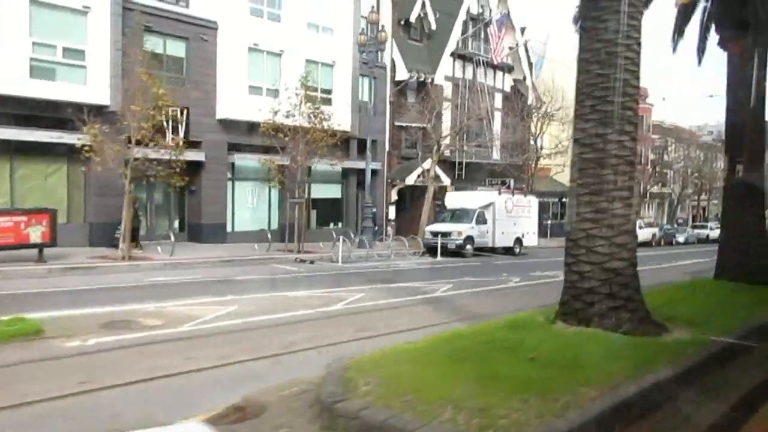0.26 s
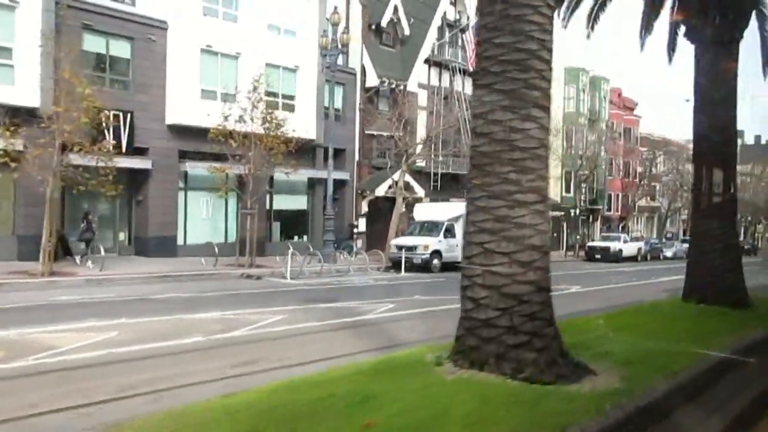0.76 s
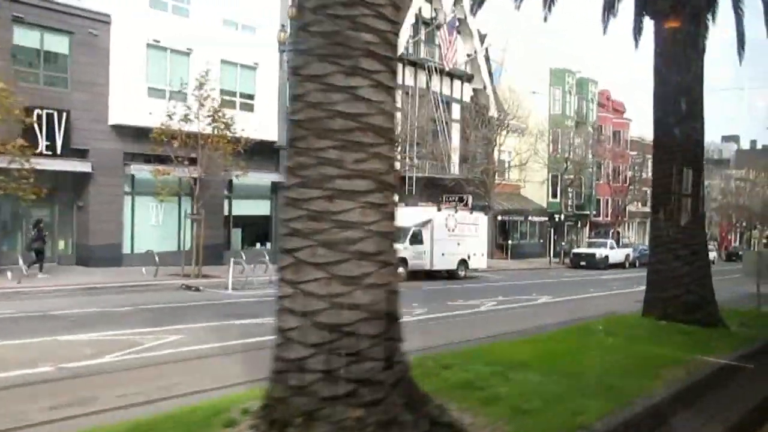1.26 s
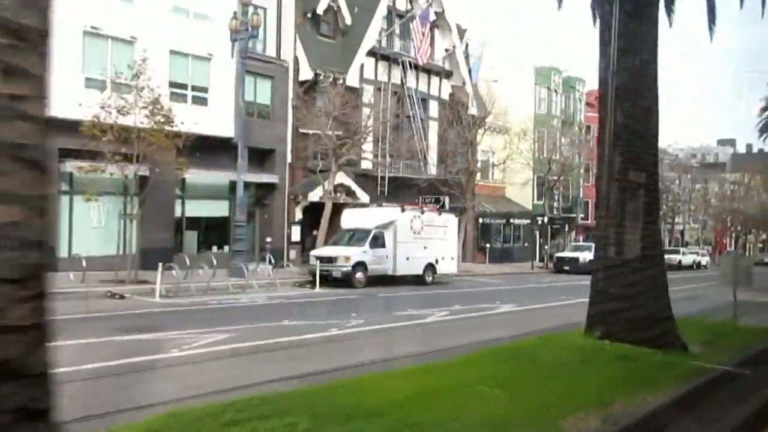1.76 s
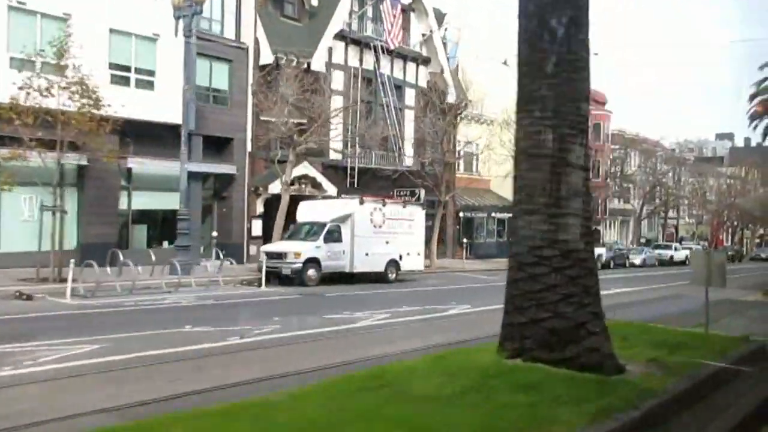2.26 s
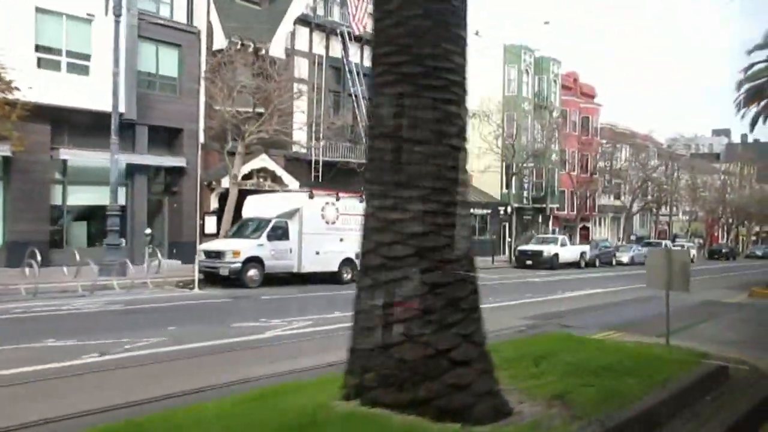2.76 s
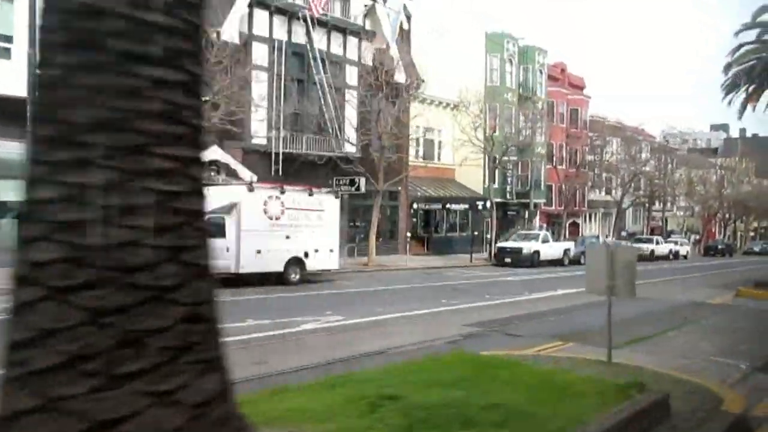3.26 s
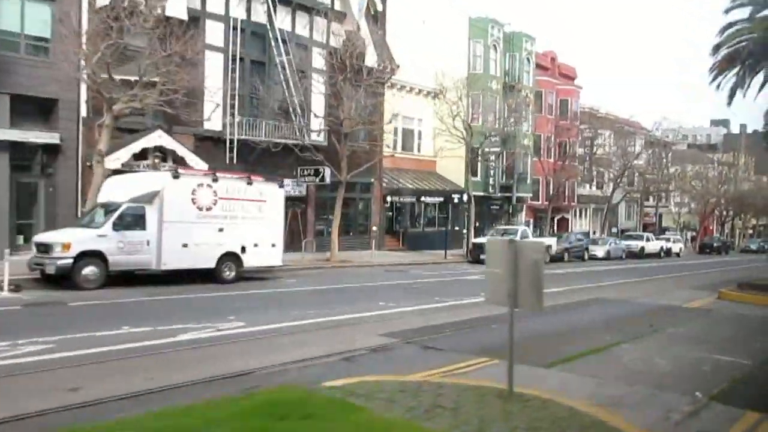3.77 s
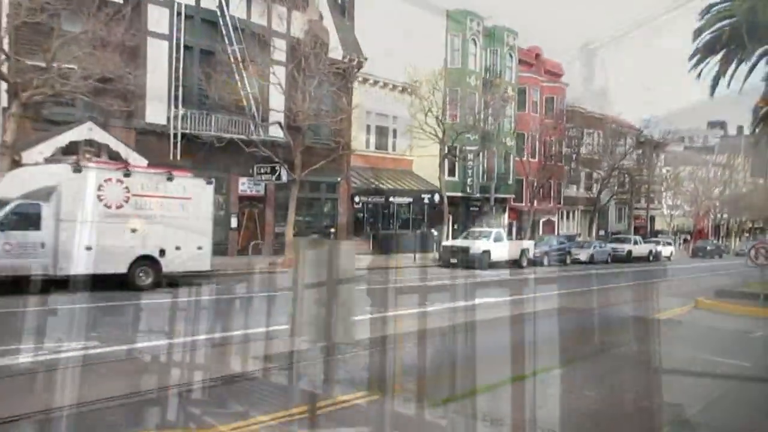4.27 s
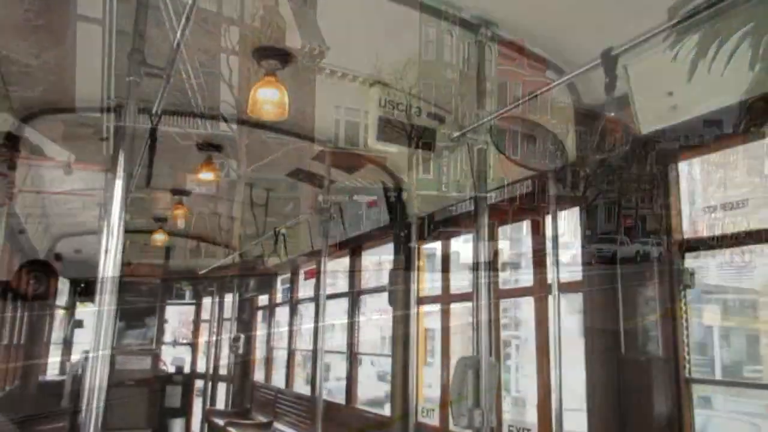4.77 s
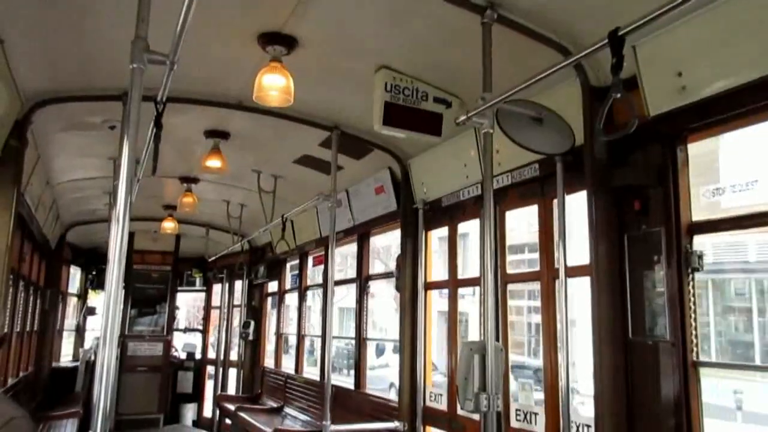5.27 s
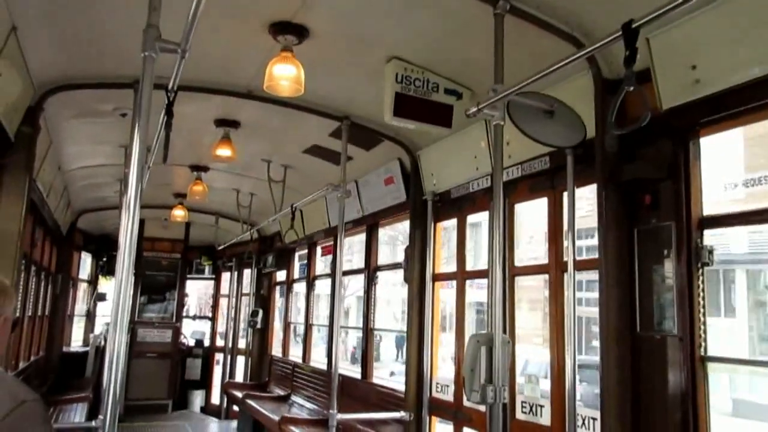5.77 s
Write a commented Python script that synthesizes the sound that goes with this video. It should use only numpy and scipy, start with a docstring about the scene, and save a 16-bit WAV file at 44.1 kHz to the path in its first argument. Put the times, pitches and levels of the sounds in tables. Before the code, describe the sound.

Inside an old wooden streetcar in motion, a strong uneven rumble shakes the body, with brief low booms and two wavering hums. Rail joints bring rattles and dull floor knocks, thickest in the first second and again near 2.5 to 2.9 seconds. Faint high squeaks follow. After 4.2 seconds another stretch fades in with a brighter roll, and a low drone sounds near the end. Single microphone in the cabin, no voices.

```python
"""Inside an old wooden streetcar rolling along city rails. Wheel roughness shakes the body into a rumble
with booms and two hums, all from filtered noise and wavering sines; rolling contact hisses over it.
Rail joints jolt the car with bursts of rattle and floor knocks, wheel flanges sing faintly, and
something squeaks very high among faint ticks. Late on, a second stretch of track fades in with a
brighter roll, and a low drone follows."""
import sys
import numpy as np
from scipy import signal
from scipy.fft import rfft, irfft
from scipy.io import wavfile

SR = 44100
rng = np.random.default_rng(int(sys.argv[2]) if len(sys.argv) > 2 else 0)


def int16_out(signal):
    """Quantize to a 16-bit WAV file."""
    q = np.round(np.clip(np.atleast_2d(signal).T, -1, 1) * 32767)
    wavfile.write(sys.argv[1], SR, q.astype(np.int16))


def elevation(decibels):
    """Turn decibel levels (scalar or array-like) into linear amplitude ratios."""
    levels = np.asarray(decibels, float)
    return 10 ** (levels / 20)


N = 265472
TIME = np.arange(N) / SR

# Jolts at the rail joints. Each row: start in seconds, rattle level ahead of its envelope in dB,
# t60 in seconds, treble slope in dB per octave, wheel ring ahead of the envelope in dB, rumble lift in dB.
JOLT_TABLE = [(.29, -26.5, .45, -19, -37, 7), (.475, -36, .25, -20, -34, 2.5), (.575, -35, .4, -14, -50, 3),
              (.63, -32, .25, -14, -44, 2), (.7, -29.5, .22, -14, -44, 2), (.79, -28, .5, -9, -39, 2.5),
              (.97, -38, .6, -14, -39, 4.5), (1.19, -29.5, .6, -12, -41, 3.5),
              (2.45, -27.5, .55, -14, -30, 2.5), (2.852, -27, .2, -15, -34, 2),
              (3.48, -41, .4, -11, -52, 1.5), (4.03, -38, .6, -14, -40, .8), (4.36, -42, .5, -14, -42, 0),
              (5.06, -37, .5, -14, -50, 1.5)]
# Ringing modes of a wheel. Each row: frequency in Hz, width of one filter pass in Hz, relative level in dB.
WHEEL_MODES = [(1060, 90, 0), (1570, 90, -9), (1830, 120, -12), (2360, 130, -1), (2560, 140, -4),
               (2780, 90, -9), (3190, 90, -11)]


def unit_rms(x):
    """Scaled to unit power."""
    return x / np.sqrt(np.mean(x ** 2) + 1e-20)


def over_time(rows):
    """A curve of (seconds, value) points drawn out over time."""
    seconds, values = np.transpose(rows)
    return np.interp(TIME, seconds, values)


def drift(rate_hz):
    """Slow chance of spread 1: noise twice through a one-pole low-pass, made at every 40th sample."""
    r = np.exp(-80 * np.pi * rate_hz / SR)
    white = rng.standard_normal(N // 40 + 2002)
    slow = signal.lfilter([1], [1, -2 * r, r * r], white)[2000:]  # skip the filter's start-up
    return np.interp(np.arange(N) / 40, np.arange(len(slow)), unit_rms(slow))


def coloured(white, spectrum):
    """White noise given a spectrum of (Hz, dB per Hz) points, joined on a log axis; rms 1."""
    hz, db = np.transpose(spectrum)
    bins_hz = np.fft.rfftfreq(len(white), 1 / SR) + 1
    gain = elevation(np.interp(np.log(bins_hz), np.log(hz), db))
    return unit_rms(irfft(rfft(white) * gain, len(white)))


def resonances(x, modes):
    """Parallel resonances, each passed twice so that its skirts are steep."""
    out = 0
    for hz, width_hz, db in modes:
        r = np.exp(-np.pi * width_hz / SR)
        b = (1 - r * r) / 2 * np.array([1, 0, -1])
        a = [1, -2 * r * np.cos(2 * np.pi * hz / SR), r * r]
        once = signal.lfilter(b, a, x)
        out = out + elevation(db) * signal.lfilter(b, a, once)
    return out


def ringing_mode(white, hz, width_hz):
    """One narrow resonance excited by noise; rms 1."""
    return unit_rms(resonances(white, [(hz, width_hz, 0)]))


def patchy(x, own_db, shared_db=0):
    """Octave by octave the level flickers on its own, on top of a movement that all octaves share."""
    out, rest = 0, x
    for edge_hz in 60 * 2. ** np.arange(8):
        low_pass = signal.butter(2, edge_hz, fs=SR, output="sos")
        low = signal.sosfiltfilt(low_pass, rest)
        out = out + low * elevation(shared_db + own_db * drift(7.7))
        rest = rest - low
    return out + rest * elevation(shared_db + own_db * drift(5.0))


def two_stretches(spectra, later):
    """Noise of the first stretch fades out as that of the second fades in, at equal power."""
    first, second = (coloured(rng.standard_normal(N), spectrum) for spectrum in spectra)
    return np.sqrt(1 - later) * first + np.sqrt(later) * second


def wavering_tone(hz, level_db, waver_hz, flicker_db):
    """A near sine whose pitch wavers and whose level flickers."""
    phase = 2 * np.pi * np.cumsum(hz + waver_hz * drift(7.0)) / SR
    return np.sqrt(2) * elevation(level_db + flicker_db * drift(20.7)) * np.sin(phase)


def swells():
    """Each jolt briefly lifts the rumble, in dB; the body answers a little after the rattle."""
    lag_s, half_s = 0.049, 0.043
    return sum(lift_db * np.exp(-((TIME - s - lag_s) / half_s) ** 2) for s, *_, lift_db in JOLT_TABLE)


def rumble(later):
    """Broad shaking of the body, with narrow resonances that swell and sink one by one."""
    # Rumble level along the ride. Each row: time in seconds, level in dB.
    ride_level = [(0, -18.5), (.25, -20.5), (.4, -19.5), (.47, -18), (.55, -22.5), (.6, -14), (.65, -20),
                  (.7, -15.5), (.86, -15.5), (.95, -18.5), (1.0, -18), (1.15, -16), (1.24, -17.5),
                  (1.4, -15.5), (1.72, -15.5), (1.79, -13.5), (2.65, -15.5), (2.92, -15), (3.0, -20.5),
                  (3.4, -17), (3.52, -19.5), (3.92, -14.5), (4.39, -15.5), (4.73, -20.5), (5.2, -18),
                  (5.7, -17), (6.02, -17)]
    # Colour of the body's shaking, one list for each stretch. Each row: frequency in Hz, dB per Hz.
    rumble_colours = [(12, -51.5), (20, -20), (54, -6), (80, -14), (112, -6.5), (138, -2), (199, -1.5),
                      (297, -10), (352, -0.5), (460, -2.5), (553, -9), (841, -13.5), (1100, -23.5),
                      (1430, -55.5), (2420, -120)], [(12, -45), (20, -20), (92, -9), (177, -9.5),
                      (202, -7.5), (318, -11), (352, -14), (445, -5.5), (492, -25), (517, -13.5),
                      (1100, -30), (1430, -36), (2420, -120)]
    # Body resonances. Each row: frequency in Hz, width of one filter pass in Hz, dB over the broad shaking.
    body_modes = [(90.7, 17.3, -12), (146.3, 33, -12), (292, 63, -18), (376.5, 84, -19), (433, 20.5, -17.5),
                  (446.7, 22, -14.5)]
    out = patchy(two_stretches(rumble_colours, later), own_db=1.5, shared_db=0.22 * drift(1.7))
    for hz, width_hz, db in body_modes:
        out = out + elevation(db + 1.8 * drift(2.1)) * ringing_mode(rng.standard_normal(N), hz, width_hz)
    return elevation(over_time(ride_level) + swells()) * unit_rms(out)


def roll(later):
    """Steel on steel: the hiss of rolling contact, with wheel modes that come and go."""
    # Level of the roll. Each row: time in seconds, level in dB.
    roll_level = [(0, -38.5), (.3, -35), (.6, -35.5), (1.1, -34.5), (1.35, -32), (2.3, -32), (2.88, -34),
                  (2.97, -38), (3.3, -37), (3.7, -35), (4.2, -34.5), (4.65, -35), (5.05, -28),
                  (5.45, -24.5), (6.02, -25)]
    # Colour of the rolling contact, one list for each stretch. Each row: frequency in Hz, dB per Hz.
    roll_colours = ([(470, -27), (800, -10.5), (890, -10), (1340, -18), (1550, -18), (2000, -21.5),
                    (3100, -24.5), (3400, -27.5), (5100, -33), (6100, -38), (9100, -40.5), (9800, -47),
                    (12500, -49), (14800, -58.5)], [(470, -3.5), (800, 0), (830, 2), (1020, -1.5),
                    (1300, -6.5), (1580, -8), (1830, -11.5), (2340, -16.5), (2950, -17.5), (6280, -32),
                    (7270, -30.5), (10200, -41.5), (14800, -49.5)])
    # Broad resonances of the second stretch. Each row: frequency in Hz, width of one filter pass in Hz,
    # dB over the contact hiss.
    second_modes = [(1560, 160, -22), (2250, 300, -26), (2900, 350, -26), (3200, 200, -31),
                    (3860, 350, -31), (4300, 350, -32), (5700, 200, -41)]
    out = patchy(two_stretches(roll_colours, later), own_db=0.8)
    white = rng.standard_normal(N)
    for hz, width_hz, db in WHEEL_MODES:
        level = elevation(-24 + db + 3.0 * drift(3.0))  # the wheel rings well under the hiss
        out = out + (1 - later) * level * ringing_mode(white, hz, width_hz)
    for hz, width_hz, db in second_modes:
        out = out + later * elevation(db + 2.0 * drift(4.0)) * ringing_mode(white, hz, width_hz)
    return elevation(over_time(roll_level)) * unit_rms(out)


def jolts():
    """Each joint sends a burst of uneven rattle through the car and sets the wheel ringing."""
    ringing = unit_rms(resonances(rng.standard_normal(N), WHEEL_MODES))
    white = rng.standard_normal(N) * elevation(0.43 * drift(60.0))
    out = 0
    for s, db, t60, tilt_db, ring_db, _ in JOLT_TABLE:
        since = np.maximum(TIME - s, 0)
        rise = 1 - np.exp(-since / (.035 * t60))  # longer bursts rise more slowly
        shape = rise * elevation(-60 * since / t60)
        rattle = coloured(white, [(300, -25), (900, 0), (2500, -9), (4000, -16), (16000, 2 * tilt_db - 16)])
        out = out + shape * (elevation(db) * rattle + elevation(ring_db) * ringing)
    return out


def knocks():
    """Wheels knock over gaps in the rail and strike every floor mode, each with a strength of its own."""
    # Knocks. Each row: start in seconds, strength in dB.
    knock_rows = [(.291, -12), (0.314, -11), (.584, -11), (0.663, -25), (.716, -8), (0.785, -18),
                  (.986, -5), (1.409, -14), (2.479, -9.5), (2.658, -13), (2.775, -10.5), (2.864, -3),
                  (3.551, -13), (4.135, -16)]
    # Modes of the floor. Each row: frequency in Hz, relative strength in dB, t60 in seconds.
    floor_modes = [(150, -13, .12), (213, -17, 0.15), (260, -9.5, 0.076), (347, -7.5, .1),
                   (450, -6.5, 0.22), (634, -9.5, 0.15), (874, -19, .06), (1080, -29, 0.055),
                   (1570, -28, .05)]
    s, db = np.transpose(knock_rows)
    spread_db = rng.normal(0, 1.8, (len(s), len(floor_modes)))
    out = 0
    for k, (hz, mode_db, t60) in enumerate(floor_modes):
        clicks = np.full(N, 1e-18)
        clicks[(s * SR).astype(int)] = elevation(db + mode_db + spread_db[:, k])
        r, w = elevation(-60 / (t60 * SR)), 2 * np.pi * hz / SR
        out = out + signal.lfilter([0, np.sin(w)], [1, -2 * r * np.cos(w), r * r], clicks)
    # the contact is soft: it carries little outside this band
    soft_contact = signal.butter(2, (120, 1100), "band", fs=SR, output="sos")
    return signal.sosfilt(soft_contact, out)


def booms():
    """Single body modes boom up for a moment, each swelling and sinking as a near pure tone."""
    # Booms. Each row: middle in seconds, half length in seconds, frequency in Hz, level at the middle in dB.
    boom_rows = [(0.438, 0.085, 155, -27), (0.702, 0.092, 145, -20.5), (1.07, 0.059, 86, -20),
                 (1.24, 0.057, 160, -14.5), (1.848, 0.071, 145, -18), (0.33, 0.049, 170, -19.5),
                 (2.898, 0.062, 360, -21), (3.343, 0.051, 432, -22), (3.562, 0.046, 150, -31),
                 (4.085, 0.055, 150, -23)]
    out = 0
    for s, half_s, hz, db in boom_rows:
        swell = elevation(db) * np.exp(-((TIME - s) / half_s) ** 2)
        out = out + np.sqrt(2) * swell * np.sin(2 * np.pi * hz * TIME)
    return out


def frame_hum():
    """A low hum of wavering pitch that swells and sinks."""
    # Level of the frame hum before its flicker. Each row: time in seconds, level in dB.
    frame_level = [(0.0, -35), (0.15, -25.5), (0.23, -40), (0.33, -26), (0.65, -25.5), (0.69, -38),
                   (0.75, -25.5), (1.68, -29.5), (1.76, -20.5), (2.06, -23), (2.13, -16), (2.72, -29),
                   (2.8, -15.5), (2.9, -28), (3.2, -25), (3.32, -35), (3.45, -23.5), (3.54, -39),
                   (3.6, -16), (3.7, -30), (4.06, -17.5), (4.21, -35), (4.27, -20), (4.76, -32),
                   (5.31, -33), (5.5, -21.5), (5.55, -33), (5.67, -27.5), (5.85, -40), (6.02, -20)]
    return wavering_tone(206.3, over_time(frame_level), waver_hz=6, flicker_db=4.0)


def gear_hum():
    """A higher hum that wavers more widely."""
    # Level of the gear hum before its flicker. Each row: time in seconds, level in dB.
    gear_level = [(0.0, -34), (0.08, -46), (0.12, -27), (0.47, -33.5), (0.74, -20), (0.75, -26.5),
                  (1.81, -24), (1.86, -36), (1.94, -22.5), (2.77, -26), (2.95, -20), (2.98, -29.5),
                  (3.25, -35), (3.44, -20.5), (3.5, -31), (3.96, -15), (4.01, -30), (4.04, -23.5),
                  (4.16, -25.5), (5.43, -31), (5.56, -28), (5.6, -39), (5.7, -22), (5.73, -46), (5.9, -28),
                  (6.02, -32)]
    return wavering_tone(468, over_time(gear_level), waver_hz=12, flicker_db=3.5)


def drone():
    """A low tone that rises, holds while its pitch sags, and dies away."""
    start_s, attack_s, hold_s, release_s = 5.5, .1, .31, .04
    since = TIME - start_s
    rise = np.clip(since / attack_s, 0, 1)
    fall = np.exp(-np.maximum(since - attack_s - hold_s, 0) / release_s)
    pitch_hz = 93.8 - 6.0 * since
    return rise * fall * wavering_tone(pitch_hz, -18.5, waver_hz=0.5, flicker_db=.3)


def flanges():
    """Rubbing noise in the high modes of a wheel; the strongest mode also sings as a wavering tone."""
    # Flange modes, middle and high. Each row: frequency in Hz, width of one filter pass in Hz,
    # relative level in dB.
    flange_modes, high_modes = [(4980, 180, -7), (5340, 400, 0), (4400, 300, -14)], [(6500, 500, -7), (7200, 400, -7), (7810, 300, 0),
                                                (8250, 300, -3), (9020, 300, -2), (10300, 900, -11),
                                                (11500, 900, -14)]
    # Levels of the two rubbing noises. Each row: time in seconds, level in dB.
    flange_level, high_level = [(0, -58), (.12, -54.5), (.4, -56), (.66, -54.5), (.73, -55), (.79, -59),
                                (.92, -62), (1.15, -80)], [(0, -54), (.25, -58), (.45, -62), (.6, -61),
                                                      (.8, -64), (1.0, -80)]
    noise = unit_rms(resonances(rng.standard_normal(N), flange_modes))
    squeal = wavering_tone(5340, -14, waver_hz=40, flicker_db=1.0)  # level relative to the noise
    high = elevation(over_time(high_level)) * unit_rms(resonances(rng.standard_normal(N), high_modes))
    return high + elevation(over_time(flange_level) + .5 * drift(12.0)) * (noise + squeal)


def singing():
    """Now and then one wheel mode sings out as a short wavering tone that swells and sinks."""
    # Tones. Each row: middle in seconds, half length in seconds, frequency in Hz, level before flicker in dB.
    singing_rows = [(1.03, .05, 2360, -51), (2.5, 0.074, 2365, -44), (2.51, 0.042, 1060, -33),
                    (2.53, .04, 2600, -49), (3.9, 0.08, 865, -32.5), (3.78, 0.088, 1570, -49),
                    (4.05, 0.062, 1570, -44), (4.133, .1, 2325, -51), (4.45, 0.21, 2334, -53.5),
                    (5.03, 0.066, 1560, -46), (5.62, .1, 1590, -54)]
    out = 0
    for s, half_s, hz, db in singing_rows:
        swell = np.exp(-((TIME - s) / half_s) ** 2)
        out = out + swell * wavering_tone(hz, db, waver_hz=14, flicker_db=2.0)
    return out


def squeaks():
    """Two short uneven swells of very high rubbing, lines over a hiss; a duller hiss joins late."""
    # Lines in the squeak. Each row: frequency in Hz, width of one filter pass in Hz, relative level in dB.
    squeak_modes = [(10800, 600, -8), (11800, 400, -4), (13300, 400, -5), (14100, 700, 0), (14600, 400, -5)]
    # Swells. Each row: middle in seconds, half length in seconds, gain in dB.
    squeak_rows = [(3.71, .125, -63.5), (4.42, 0.13, -61.5)]
    white = rng.standard_normal(N)
    hiss = coloured(white, [(10000, -26.0), (11500, -8), (12500, -11.5), (14200, -7), (16000, -10.0)])
    dull = coloured(white, [(6000, -20), (8000, 1), (11000, 3.0), (12500, -20)])
    rubbing = unit_rms(resonances(white, squeak_modes)) + 1.7 * hiss
    dull_lag_s, dull_db = .05, 2
    swell, late = 0, 0
    for s, half_s, db in squeak_rows:
        swell = swell + elevation(db) * np.exp(-(np.abs(TIME - s) / half_s) ** 2.6)
        late = late + elevation(db + dull_db) * np.exp(-(2 * (TIME - s - dull_lag_s) / half_s) ** 2)
    return elevation(1.5 * drift(25.0)) * (swell * rubbing + late * dull)


def ticks():
    """Faint dry ticks: tiny bursts of treble noise that start at once and decay."""
    # Ticks. Each row: start in seconds, nominal peak in dB, 6.5 dB over the rms at the start.
    tick_rows = [(4.276, -57), (4.775, -60), (5.575, -57), (5.812, -57)]
    t60_s = .03
    white = coloured(rng.standard_normal(N), [(5000, -30), (9000, 0), (16000, 0)])
    shape = sum(elevation(db - 6.5 - 60 * np.abs(TIME - s) / t60_s) * (TIME >= s) for s, db in tick_rows)
    return white * shape


def microphone_hiss():
    """Steady faint noise of the microphone, weighted to the treble."""
    # Colour of the hiss. Each row: frequency in Hz, dB per Hz.
    hiss_colour = [(6000, -26), (10000, -3), (13000, -6), (15000, -4.5)]
    return elevation(-73.5) * coloured(rng.standard_normal(N), hiss_colour)


def scene():
    """All sources, heard at one spot, as the first stretch of track fades into the second."""
    later = np.interp(TIME, (4.21, 5.04), [0, 1])  # share of the second stretch
    car = rumble(later) + roll(later) + booms()
    tones = frame_hum() + gear_hum() + drone()
    track = jolts() + knocks()
    high = flanges() + singing() + squeaks() + ticks()
    return (car + tones + track + high)[None]


def top_cut(x):
    """Nothing passes above the cut-off."""
    return signal.sosfilt(signal.butter(12, 14900, fs=SR, output="sos"), x)


def record(dry):
    """The microphone hisses faintly and peaks are slightly rounded."""
    heard = dry + microphone_hiss()
    mix = 1.524 * np.tanh(heard / 1.638)
    return top_cut(mix)


dry = scene()
out = record(dry)
int16_out(out)
```